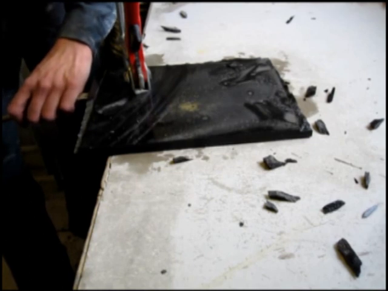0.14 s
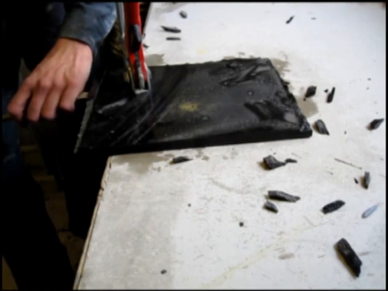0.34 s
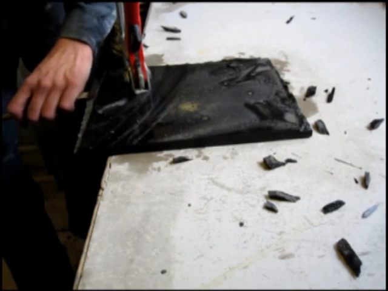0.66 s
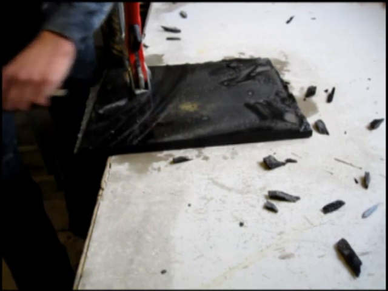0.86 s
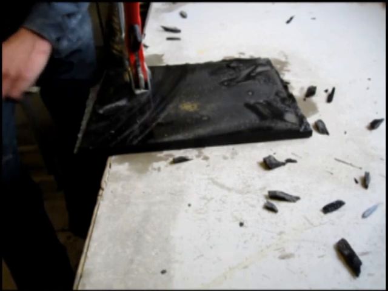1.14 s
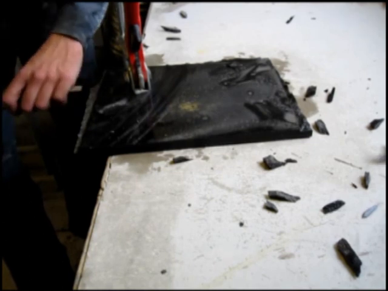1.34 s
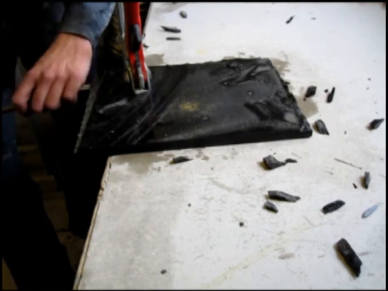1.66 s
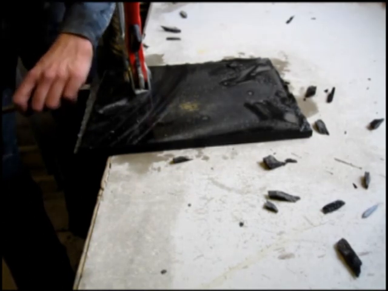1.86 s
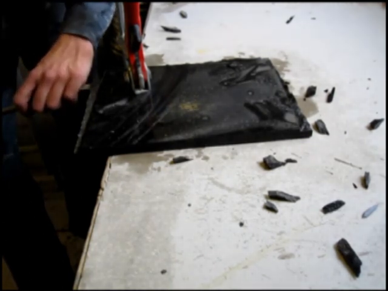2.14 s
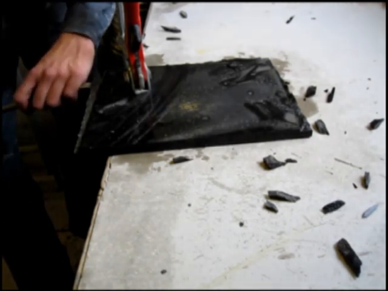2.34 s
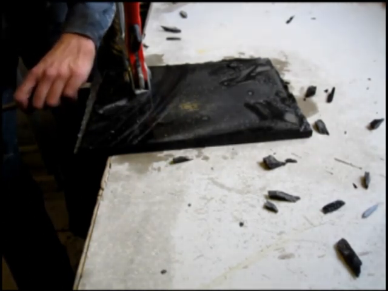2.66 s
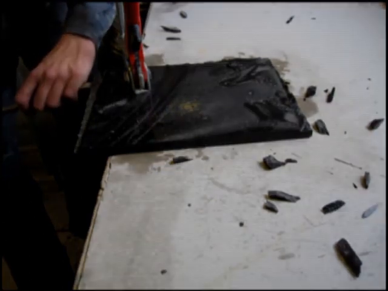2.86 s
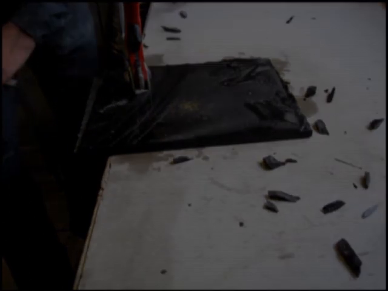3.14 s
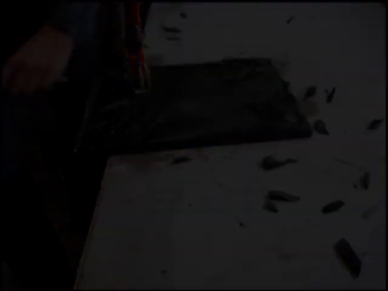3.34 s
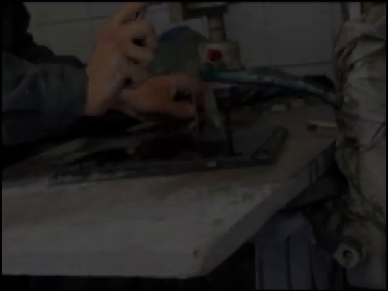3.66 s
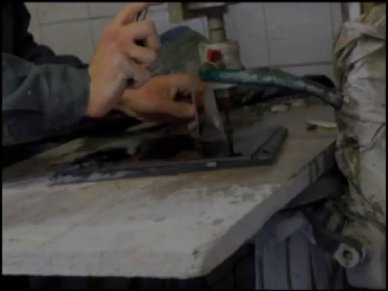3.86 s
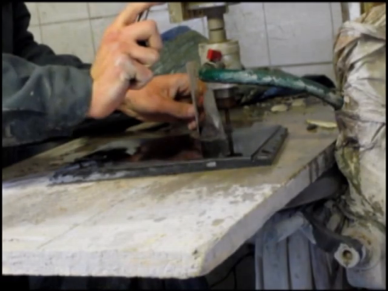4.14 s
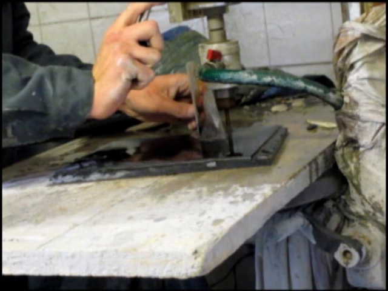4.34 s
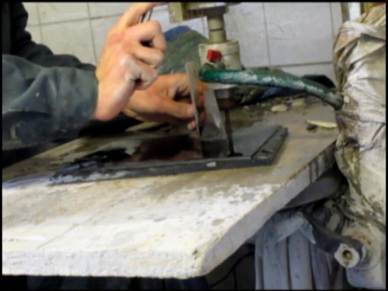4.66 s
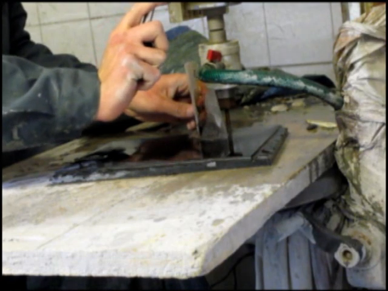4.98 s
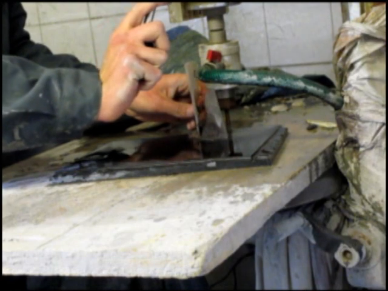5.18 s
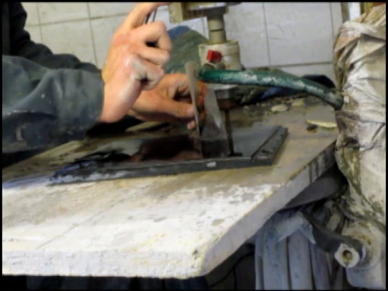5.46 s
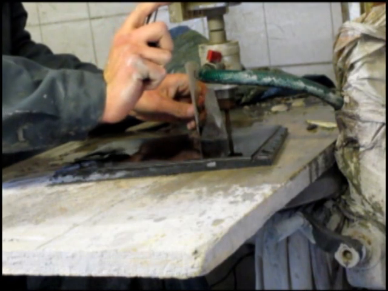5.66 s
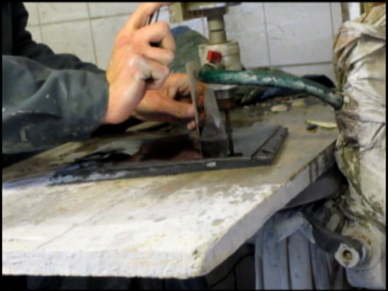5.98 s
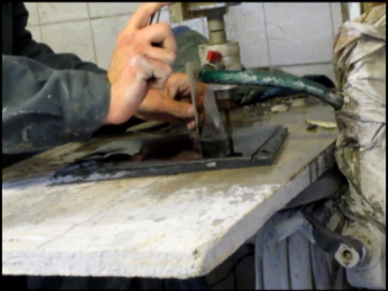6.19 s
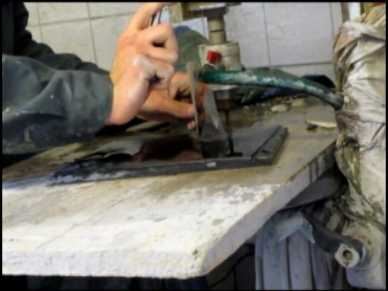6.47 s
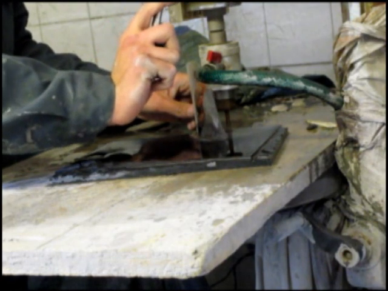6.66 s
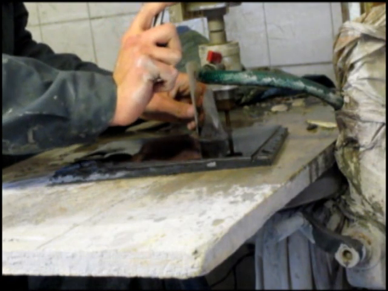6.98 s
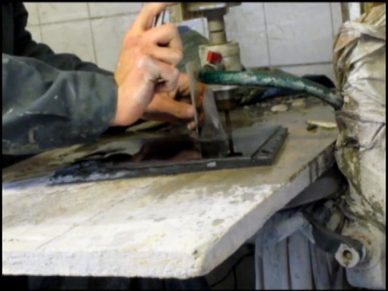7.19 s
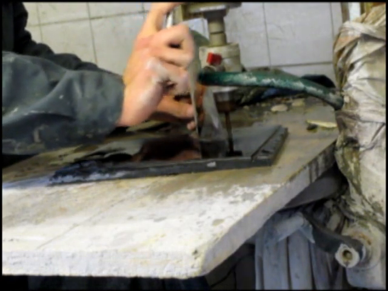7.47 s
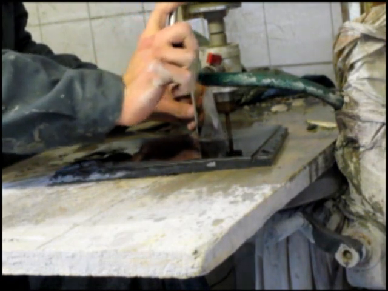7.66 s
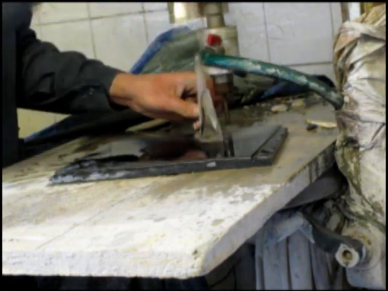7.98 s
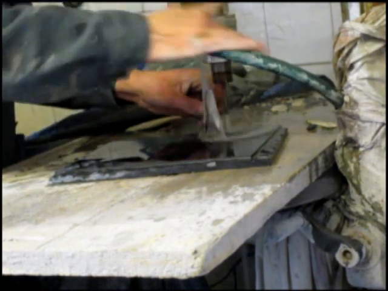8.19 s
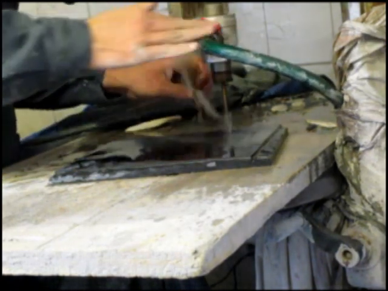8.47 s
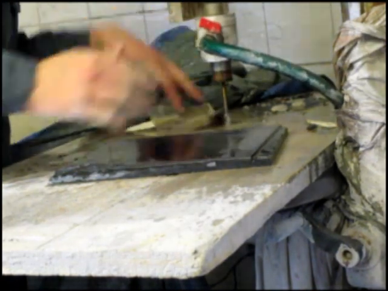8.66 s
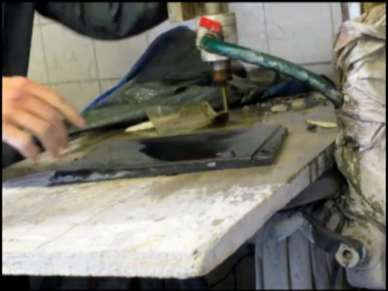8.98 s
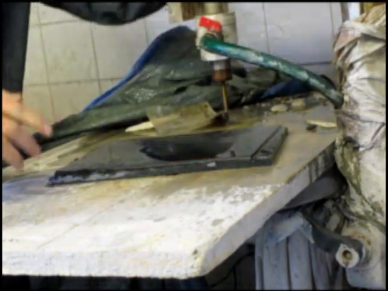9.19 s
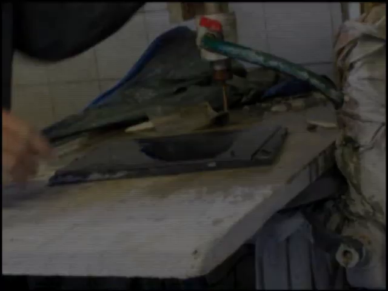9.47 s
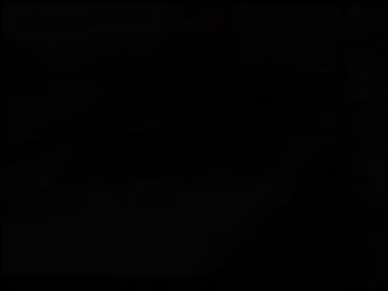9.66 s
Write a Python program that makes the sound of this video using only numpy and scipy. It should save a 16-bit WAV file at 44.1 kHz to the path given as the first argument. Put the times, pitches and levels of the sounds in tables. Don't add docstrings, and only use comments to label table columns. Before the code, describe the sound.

Three hammer blows on a steel chisel crack stone in a workshop, then a water-fed drill grinds, lifts, rattles free and switches off.

```python
import sys
import numpy as np
from scipy import signal
from scipy.fft import rfft, irfft, next_fast_len
from scipy.io import wavfile
from scipy.ndimage import uniform_filter1d, map_coordinates

SR = 44100
rng = np.random.default_rng(int(sys.argv[2]) if len(sys.argv) > 2 else 0)


def gain_from_db(level_db):
    decades = np.asarray(level_db, float) / 20
    return 10 ** decades


def put_to_file(sound):
    columns = np.atleast_2d(sound).T
    safe = np.clip(columns, -1, 1)
    whole_steps = np.round(safe * 32767)
    wavfile.write(sys.argv[1], SR, whole_steps.astype(np.int16))


N = 433493
T = np.arange(N) / SR

CUT_S = 3.521
LIFT_S, LIFT_LASTS_S = 7.47, 0.097
STEADY_S, STEADY_LASTS_S = 8.4, 0.1
SURGE_S, SURGE_LASTS_S = 9.27, 0.2
OFF_S = 9.475

# start_s, peak_db, slack_db [grip on the chisel]
BLOWS = [
    (0.8243, -0.5, 3),
    (1.3456, -5, -3.5),
    (2.984, -1.5, 9.5),
]
# pitch_hz, level_db
RINGS = [
    [(2536, -39), (2643, -47), (3257, -65), (4054, -33.5), (5012, -51.5), (5572, -45.5), (7095, -52)],
    [(2676, -50.5), (3548, -50), (3908, -43.5), (5066, -42.5)],
    [(1055, -55.5), (2046, -37), (2536, -47.5), (3558, -47), (3914, -52), (4037, -51), (5620, -45)],
]
# centre_hz, width_hz, lift_db
GRIP = [
    [(2510, 350, 6.5), (4050, 180, 12.5), (5550, 350, 10), (7100, 250, 3), (8620, 450, 11.5),
     (10500, 680, 9)],
    [(3700, 500, -1.5)],
    [(1100, 270, 13), (2020, 310, 8), (2470, 200, 4.5), (3800, 450, 9.5), (5570, 350, 5.5), (8400, 450, 8)],
]
# freq_hz, density_db_per_hz
CRUNCH = [
    [(24, -68), (40, -34.5), (646, -3.5), (1590, -11), (4030, -13), (4340, -17.5), (8770, -24),
     (16000, -35)],
    [(24, -48), (40, -25), (75, -49), (220, -24), (455, -14), (1180, -7), (1340, 0.5), (1680, -6.5),
     (3560, -1), (8770, -11), (13100, -27), (16000, -45.5)],
    [(24, -81), (40, -38), (455, -5), (1440, -12), (2000, -8.5), (8550, -19), (14100, -30.5), (16000, -67)],
]
# freq_hz, density_db_per_hz
CRACK = [(180, -41.5), (300, -21.5), (1160, -5.5), (1730, -15), (2460, 0), (3670, -9), (3990, 0),
         (4410, -6), (8590, -8.5), (16200, -20.5)]
# pitch_hz, level_db
BENCH = [(446.8, -52.5), (554.5, -48.5), (786.0, -44.5)]


def chisel():
    out, t = np.zeros(N), T[:SR // 2]
    for (start_s, peak_db, slack_db), lines, grip, crunch in zip(BLOWS, RINGS, GRIP, CRUNCH):
        push_db = -14 + 0.4 * slack_db
        wet_db = -1.5 + 0.65 * slack_db
        crack_t60_s = 0.028 * gain_from_db(0.98 * slack_db)
        crack = noise(lambda hz: gain_from_db(along(CRACK, hz)), len(t)) * gain_from_db(-60 * t / crack_t60_s)
        push = gain_from_db(push_db) * (1 - t / 0.0013) * np.exp(-t / 0.00078)
        steel = gain_from_db(slack_db + 24) * ringing(lines, t60_s=0.31)
        shop = coloured(tail(), lambda hz: gain_from_db(along(crunch, hz) + grip_lift_db(grip, hz)))
        add(out, start_s, gain_from_db(peak_db + 12.5) * (crack + push))
        add(out, start_s, steel)
        add(out, start_s, gain_from_db(push_db + wet_db + 31) * ringing(BENCH, t60_s=0.99))
        add(out, start_s, gain_from_db(-8) * signal.fftconvolve(steel, tail()))
        add(out, start_s, gain_from_db(peak_db + wet_db + 35) * shop / np.linalg.norm(shop))
    return out


def grip_lift_db(grip, hz):
    return sum(lift_db / (1 + (2 * (hz - centre_hz) / width_hz) ** 2) for centre_hz, width_hz, lift_db in grip)


# freq_hz, density_db_per_hz
GRIND = [(15, -69), (25, -24), (146, -40), (188, -16), (243, -17.5), (278, -14.5), (338, -19.5), (404, -11),
         (531, -9), (609, -13), (817, -4), (937, -6.5), (1120, -2.5), (1530, -9.5), (2700, -11),
         (3510, -37), (5940, -120)]
# freq_hz, density_db_per_hz
GRIT = [(1590, -20), (2700, -3), (3280, -2), (3560, 0), (4230, -3.5), (4760, -10), (5920, -13), (6620, -12),
        (7290, -16), (8040, -11.5), (9330, -19), (11900, -20), (16100, -35)]
# pitch_hz, level_db
GRIND_TONES = [(279.9, -32), (409.6, -39.5), (512, -41), (662.1, -43.5), (990, -35.5), (807.5, -27.5),
               (841.5, -27), (1039, -36), (1128, -27.5), (1217, -37), (1407, -33.5), (2024, -38),
               (2312, -39), (2476, -40), (2509, -39.5), (2789, -41.5)]


def loaded_drill(load):
    mesh_hz = 278.9
    teeth = 1 + 0.12 * np.sin(2 * np.pi * mesh_hz * T)
    casting = rippled(GRIND, ripple_db=2.6, spacing_hz=24)
    grind = teeth * patchy(noise(casting, N), patchy_db=1.5)
    slurry = noise(rippled(GRIT, ripple_db=1.5, spacing_hz=39.6), N)
    grit = gain_from_db(-9.5 + 0.34 * wobble(20)) * patchy(slurry, patchy_db=1.2)
    gears = tones(GRIND_TONES, rough=0.68, width_hz=28, heard=(T >= CUT_S) & (load > 0))
    return gain_from_db(-2.5) * grind + grit + gain_from_db(15) * gears


# freq_hz, density_db_per_hz
FREE = [(15, -71), (25, -16), (140, -31), (185, -9.5), (288, -2.5), (339, -17.5), (398, -2), (606, -5.5),
        (680, -5), (1160, 1.5), (2280, -7), (3720, -10.5), (5790, -23.5), (6500, -26), (8450, -46),
        (14300, -120)]
# pitch_hz, level_db
FREE_TONES = [(280.4, -38), (301.5, -34), (412, -32), (534, -36), (706, -37.5), (775.2, -36.5),
              (1478, -34.5), (1066, -34.5), (1138, -33.5), (1335, -33), (1700, -36), (1990, -46)]
# pitch_hz, level_db
BEARINGS = [(3700, -17.5), (3880, -18), (6800, -35), (11700, -32), (15600, -37)]


def free_drill(load):
    still_db = -12 * bump(STEADY_S, STEADY_LASTS_S)
    surge_db = 3 * bump(SURGE_S, SURGE_LASTS_S)
    jolt_db = 2.5 * bump(OFF_S, 0.06)
    coast_db = -12 * since_off()
    sing_db = 15.5 * ramp(8.9, 0.374) - 5 * since_off()
    roar = noise(rippled(FREE, ripple_db=1.5, spacing_hz=44.52), N)
    free = gain_from_db(1.43 * wobble(45)) * patchy(roar, patchy_db=1.5)
    low_lines = [row for row in FREE_TONES if row[0] < 600]
    high_lines = [row for row in FREE_TONES if row[0] >= 600]
    low = tones(low_lines, rough=0.97, width_hz=64, heard=load < 1)
    high = tones(high_lines, rough=0.97, width_hz=64, heard=load < 1)
    rattle = gain_from_db(still_db - 1.5) * low + high
    idle = gain_from_db(surge_db + jolt_db + coast_db - 2) * (free + gain_from_db(21.5) * rattle)
    whistle = tones(BEARINGS, rough=0.99, width_hz=200, heard=load < 1)
    return idle + gain_from_db(sing_db - 13.5) * whistle


def drill():
    load = 1 - ramp(LIFT_S, LIFT_LASTS_S)
    hush_db = -0.5 * bump(7.6, 0.045)
    mix = np.sqrt(load) * loaded_drill(load) + np.sqrt(1 - load) * free_drill(load)
    return gain_from_db(-14.5 + hush_db) * mix


# freq_hz, density_db_per_hz
MIST = [(2650, -11), (4500, -7.5), (5840, -11), (6640, -2.5), (7790, -6.5), (9290, -7.5), (10200, -4.5),
        (11600, -6.5), (14000, -15), (15200, -15), (16100, -21.5)]


def spray():
    mist = patchy(noise(lambda hz: gain_from_db(along(MIST, hz)), N), patchy_db=1.5)
    bare_db = 3.5 * ramp(SURGE_S - SURGE_LASTS_S, SURGE_LASTS_S)
    shield_db = -3 * bump(STEADY_S, STEADY_LASTS_S)
    valve_db = -4 * ramp(9.37, 0.034)
    drain_db = -32 * since_off()
    level_db = -29.5 + bare_db + shield_db + valve_db + drain_db + 1.26 * wobble(35)
    return gain_from_db(level_db) * np.sqrt(ramp(LIFT_S, LIFT_LASTS_S)) * mist


# start_s, level_db, centre_hz, t60_s
TICKS = [(0.8167, -27, 1100, 0.016), (1.142, -42, 8200, 0.0089), (1.329, -20, 7000, 0.0099),
         (1.357, 2, 5000, 0.007), (1.3592, -3, 7500, .004), (1.4833, 0.5, 3040, 0.0042),
         (2.97, -24, 504, 0.022), (1.7594, -26, 730, .03), (1.9891, -27, 1200, 0.02)]
# start_s, level_db, centre_hz, t60_s
CLICKS = [
    (7.5894, -10.5, 10500, 0.01),
    (9.472, -10.5, 8620, 0.071),
    (9.4743, -9.5, 5000, 0.1),
]
# start_s, level_db, centre_hz, t60_s
KNOCKS = [(.02, -43, 900, 0.086), (.18, -41.5, 2600, 0.16), (.225, -35, 756, 0.15), (.965, -23, 548, 0.18),
          (1.2, -43, 495, 0.36), (1.717, -42, 5000, 0.045), (1.765, -34, 740, 0.074),
          (1.86, -53, 3500, .05), (1.986, -34, 1000, 0.11), (1.987, -39.5, 3230, 0.1),
          (2.03, -37, 2220, 0.15), (2.155, -47, 3500, .08), (2.293, -36.5, 600, 0.21),
          (2.35, -37.5, 905, 0.13), (7.5, -47, 90, 1.2), (8.95, -51.5, 90, 1.1)]
# start_s, level_db, centre_hz, t60_s
SCRAPES = [
    (1.332, -31, 5970, .03),
    (1.42, -24, 1300, 0.086),
    (1.484, -21.5, 1200, .05),
]
# start_s, level_db, centre_hz, width_octaves, t60_s
PINGS = [
    (1.724, -42, 4300, .08, 0.032),
    (2.32, -45, 550, 0.17, 0.19),
    (2.356, -44, 3900, 0.13, 0.066),
    (7.91, -34.5, 7220, 0.027, 0.22),
    (8.06, -22, 3370, 0.35, 0.11),
]


def contacts():
    snap_s = 0.00046
    events = []  # start_s, sound, room_db
    for start_s, level_db, hz, t60_s in TICKS:
        room_db = -1.5 - 5.5 * np.log2(hz / 1000)
        events.append((start_s, burst(level_db, hz, 0.69, snap_s, t60_s), room_db))
    for start_s, level_db, hz, t60_s in CLICKS:
        events.append((start_s, burst(level_db, hz, 0.4, snap_s, t60_s), -1.5))
    for start_s, level_db, hz, t60_s in KNOCKS:
        events.append((start_s, burst(level_db, hz, 0.73, 0.07 * t60_s, t60_s), 2))
    for start_s, level_db, hz, t60_s in SCRAPES:
        events.append((start_s, burst(level_db, hz, 1, 0.45 * t60_s, t60_s), -0.5))
    for start_s, level_db, hz, octaves, t60_s in PINGS:
        events.append((start_s, burst(level_db, hz, octaves, 0.07 * t60_s, t60_s), 2))
    out = np.zeros(N)
    for start_s, sound, room_db in events:
        add(out, start_s, sound)
        add(out, start_s, gain_from_db(room_db) * signal.fftconvolve(sound, tail()))
    return out


# pitch_hz, level_db
WHINE = [(1577, -61), (1863, -69.5), (1895, -55), (2153, -62.5), (2180, -56), (2439, -63.5), (2724, -69.5),
         (5572, -79), (5830, -72), (7854, -70), (7881, -65), (7913, -73)]
# centre_hz, width_hz, level_db
CASING = [(1120, 37, 1.5), (1550, 24, -13.5), (1940, 86, -2), (2170, 40, -2), (2480, 36, -4.5),
          (2780, 45, -4), (5030, 210, -11), (5640, 47, -11.5), (7870, 40, -12.5), (10600, 520, -14.5)]
# freq_hz, density_db_per_hz
HISS = [(15, -51), (25, -2.5), (227, -7), (631, -11), (919, -5.5), (1170, 5.5), (1710, -21), (1900, 1.5),
        (3090, -18), (7100, -23), (8130, -21.5), (12200, -32.5), (15500, -80)]


def camera():
    buzz = gain_from_db(-50 + 0.8 * wobble(20)) * noise(casing_gain, N)
    hiss = gain_from_db(-43) * patchy(noise(lambda hz: gain_from_db(along(HISS, hz)), N), patchy_db=1.8)
    whine = tones(WHINE, rough=0.15, width_hz=6, heard=T < CUT_S)
    return buzz + hiss + gain_from_db(1.5) * whine


def casing_gain(hz):
    total = 0
    for centre_hz, width_hz, level_db in CASING:
        detuning = np.abs(centre_hz * centre_hz - hz * hz + 1j * hz * width_hz)
        total = total + gain_from_db(level_db) * hz * width_hz / detuning
    return total ** 1.15 * (hz < 13300)


# freq_hz, t60_s
SHOP = [(150, 1), (600, 0.48), (2000, 0.39), (5000, 0.36), (12000, 0.31)]


def tail():
    hz, t, z = signal.stft(rng.standard_normal(3 * SR // 4), SR, nperseg=256)
    decay = gain_from_db(-60 * t / along(SHOP, hz)[:, None])
    answer = signal.istft(z * decay, SR, nperseg=256)[1]
    return np.pad(answer / np.linalg.norm(answer), (150, 0))


def burst(level_db, centre_hz, octaves, rise_s, t60_s):
    t = T[:SR // 2]
    band = noise(lambda hz: np.exp(-0.5 * (np.log2((hz + 1) / centre_hz) / octaves) ** 2), len(t))
    decay_db = -60 * np.maximum(t - rise_s, 0) / t60_s
    return gain_from_db(level_db + decay_db) * np.minimum(t / rise_s, 1) * band


def ringing(lines, t60_s):
    t = T[:SR]
    return gain_from_db(-60 * t / t60_s) * sum(gain_from_db(db) * np.sin(2 * np.pi * hz * t) for hz, db in lines)


def tones(lines, rough, width_hz, heard):
    knots = np.arange(int(T[-1] * width_hz) + 2)
    out, t = np.zeros(N), T[heard]
    for hz, db in lines:
        a, b = rng.standard_normal((2, len(knots))) * np.sqrt(0.7 * rough)
        in_phase = np.interp(t * width_hz, knots, a + np.sqrt(1 - rough))
        quadrature = np.interp(t * width_hz, knots, b)
        angle = 2 * np.pi * hz * t
        out[heard] += np.sqrt(2) * gain_from_db(db) * (in_phase * np.sin(angle) + quadrature * np.cos(angle))
    return out


def noise(gain, size):
    return unit(coloured(rng.standard_normal(size), gain))


def coloured(x, gain):
    m = next_fast_len(len(x) + 4096)
    return irfft(rfft(x, m) * gain(np.fft.rfftfreq(m, 1 / SR)), m)[:len(x)]


def rippled(spectrum, ripple_db, spacing_hz):
    knots = rng.standard_normal(1200)

    def gain(hz):
        ripple = map_coordinates(knots, [hz / spacing_hz], mode="wrap")
        return gain_from_db(along(spectrum, hz) + ripple_db * ripple)
    return gain


def patchy(x, patchy_db):
    z = signal.stft(x, nperseg=512)[2]
    field = uniform_filter1d(uniform_filter1d(rng.standard_normal(z.shape), 5, 0), 9, 1)
    return unit(signal.istft(z * gain_from_db(patchy_db * unit(field)), nperseg=512)[1][:N])


def wobble(rate_hz):
    return map_coordinates(rng.standard_normal(int(N * rate_hz / SR) + 4), [T * rate_hz])


def unit(x):
    return x / np.sqrt(np.mean(x ** 2) + 1e-20)


def along(points, hz):
    f, v = np.transpose(points)
    return np.interp(np.log(hz + 1), np.log(f + 1), v)


def ramp(start_s, lasts_s):
    return np.clip((T - start_s) / lasts_s, 0, 1)


def bump(centre_s, lasts_s):
    return np.exp(-0.5 * ((T - centre_s) / lasts_s) ** 2)


def since_off():
    return np.maximum(T - OFF_S, 0)


def add(track, start_s, sound):
    part = track[round(start_s * SR):][:len(sound)]
    part += sound[:len(part)]


def scene():
    sound = contacts() + np.where(T < CUT_S, chisel() + camera(), drill() + spray())
    return np.array([sound, sound])


def gain_control(x, ceiling_db, recover_db_per_s, attack_s):
    lag = np.exp(-1 / (attack_s * SR))
    level_db = 10 * np.log10(signal.lfilter([1 - lag], [1, -lag], x ** 2) + 1e-12)
    over_db = np.maximum(level_db - ceiling_db, 0)
    recovered_db = recover_db_per_s * T
    duck_db = np.maximum.accumulate(over_db + recovered_db) - recovered_db
    return x * gain_from_db(-signal.lfilter([1 - lag], [1, -lag], duck_db))


def roll_off(x):
    return signal.sosfilt(signal.butter(12, 16490, fs=SR, output="sos"), x)


# time_s, gain
FADE = [
    (2.8, 1),
    (3.521, 0),
    (4.24, 1),
    (9.03, 1),
    (9.743, 0),
    (9.765, .025),
    (9.7655, 0),
]


def record(dry):
    x = gain_control(dry[0], ceiling_db=-12.5, recover_db_per_s=112, attack_s=0.003)
    x = signal.sosfilt(signal.butter(2, 62, "high", fs=SR, output="sos"), x)
    x = signal.sosfilt(signal.ellip(10, 0.5, 70, 15820, fs=SR, output="sos"), x)
    x = x / (1 + np.abs(x / 0.9) ** 4) ** (1 / 4)
    x = x * np.interp(T, *np.transpose(FADE))
    return roll_off(np.array([x, x]))


dry = scene()
out = record(dry)
put_to_file(out)
```